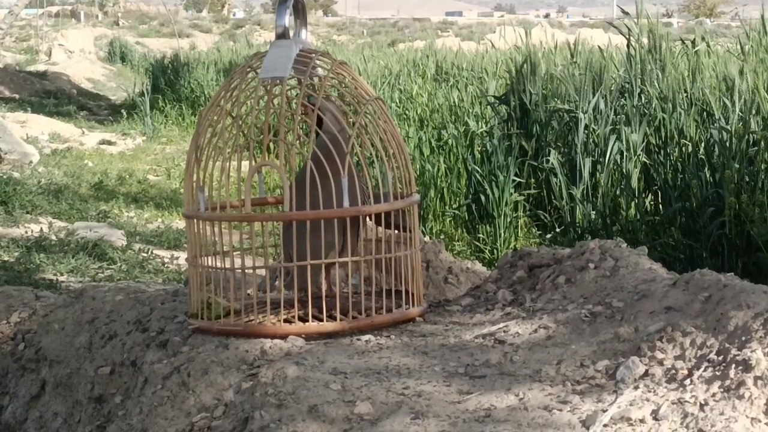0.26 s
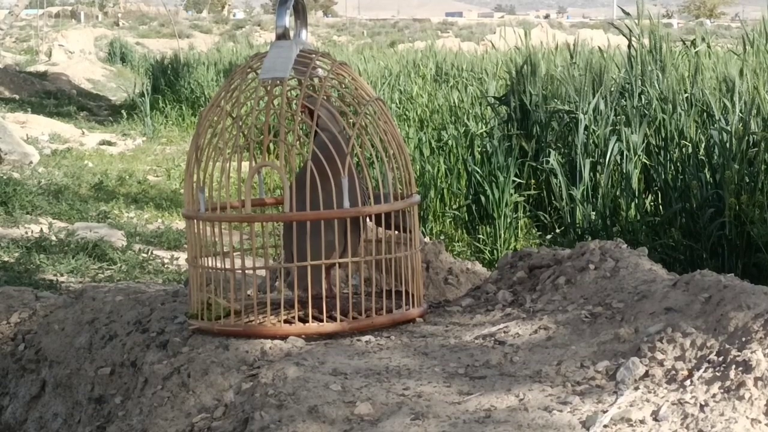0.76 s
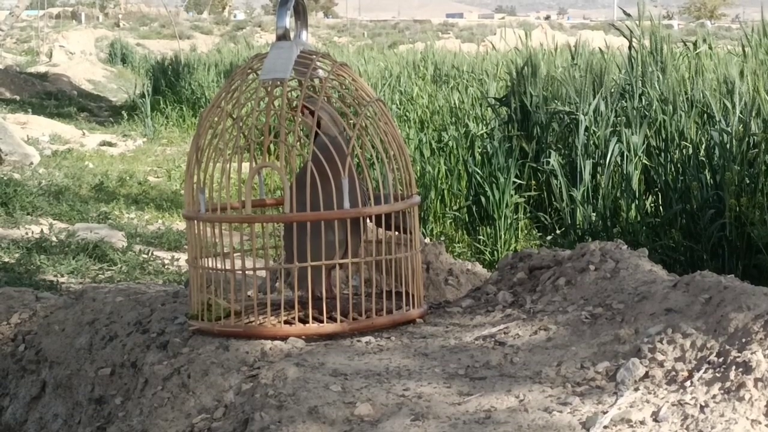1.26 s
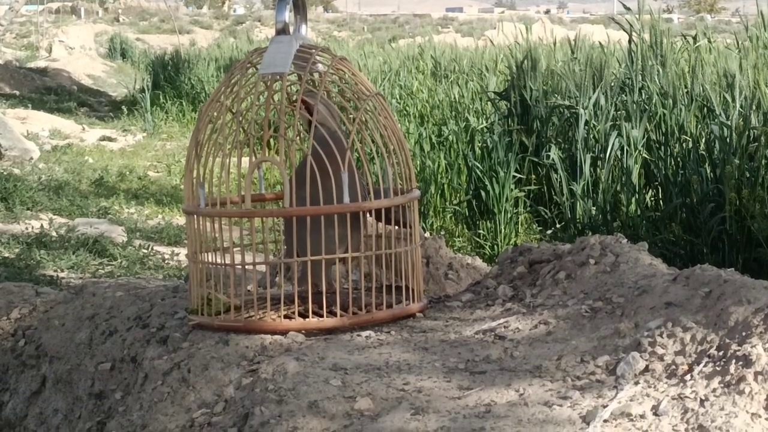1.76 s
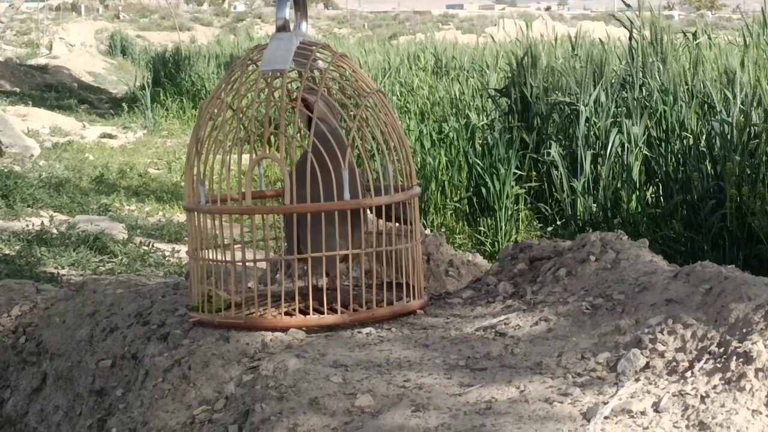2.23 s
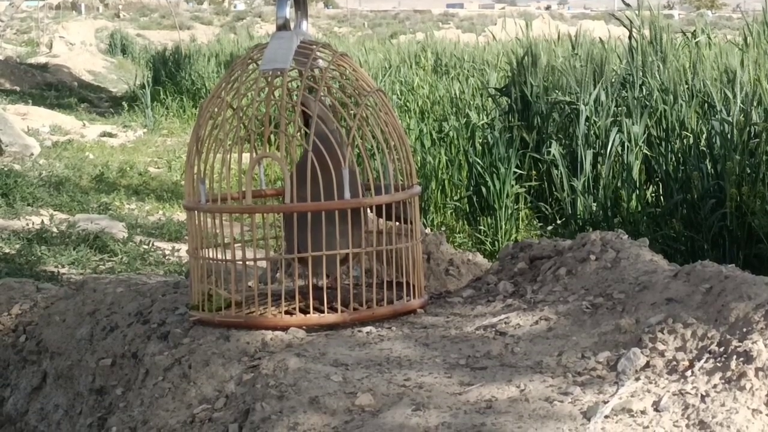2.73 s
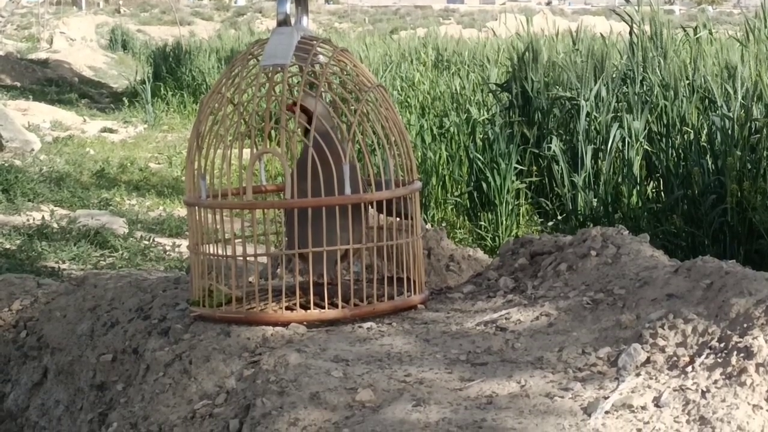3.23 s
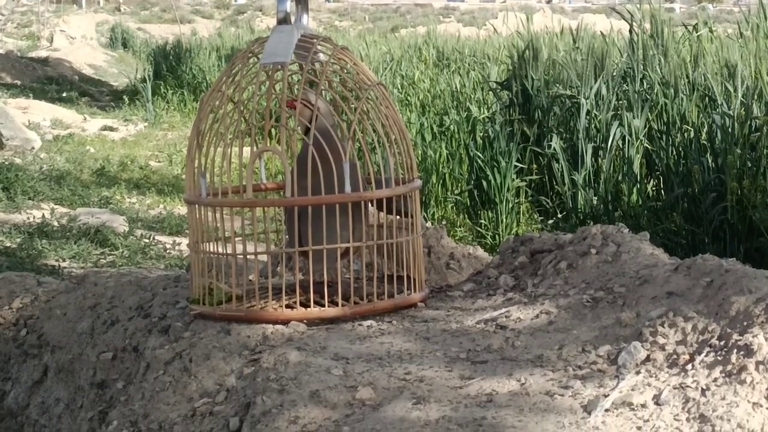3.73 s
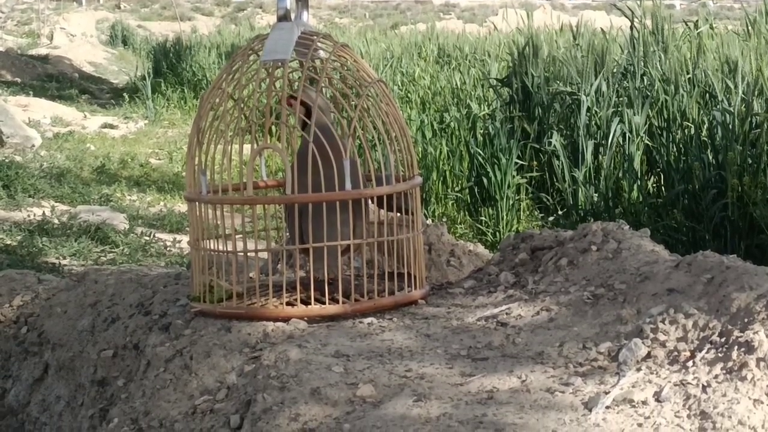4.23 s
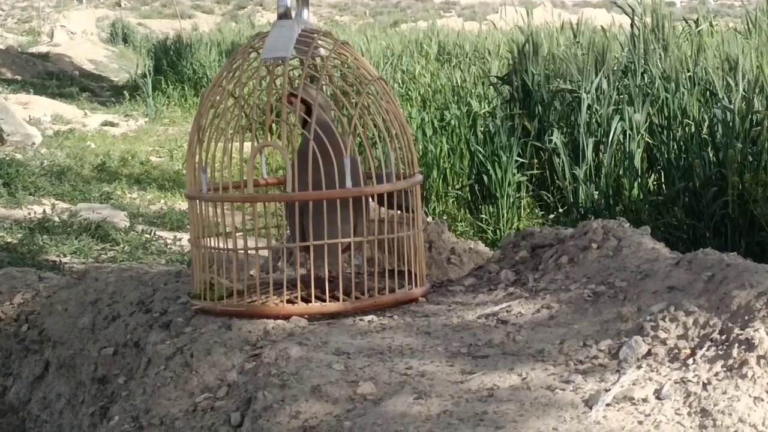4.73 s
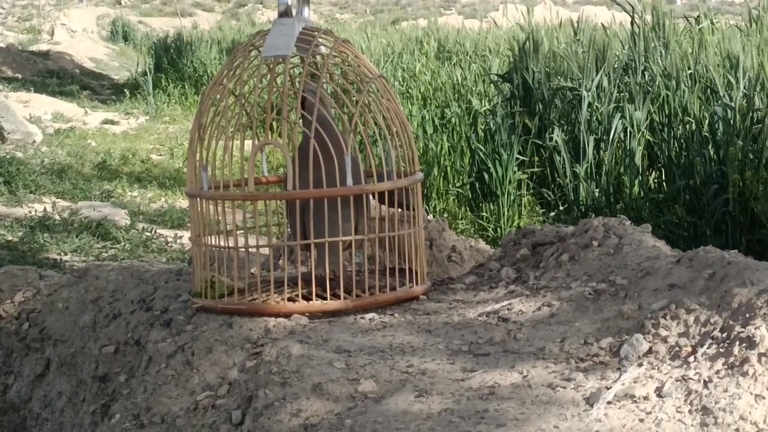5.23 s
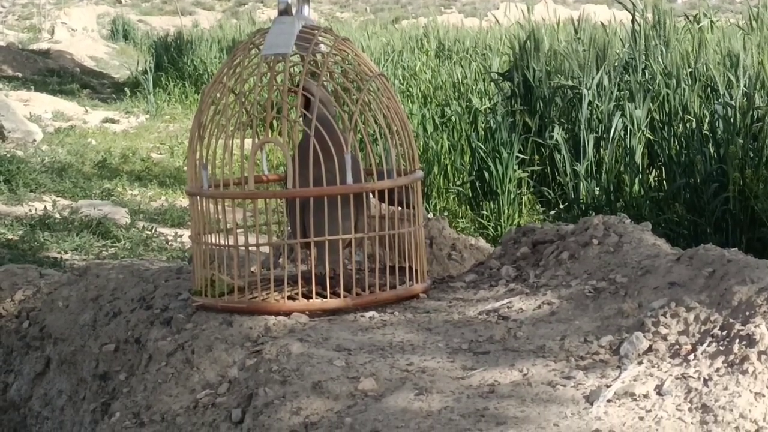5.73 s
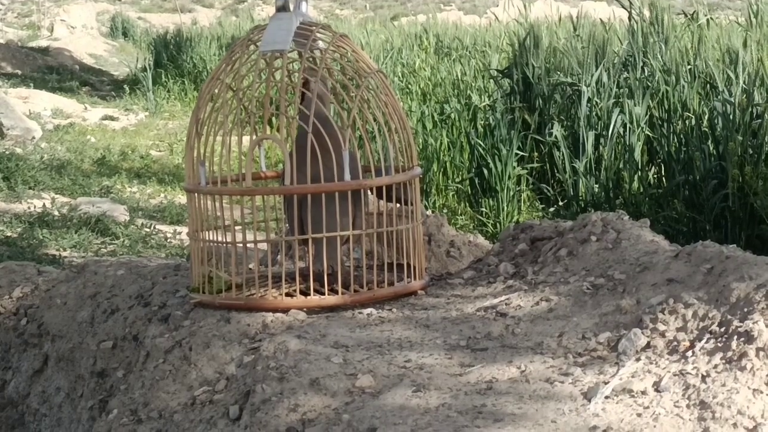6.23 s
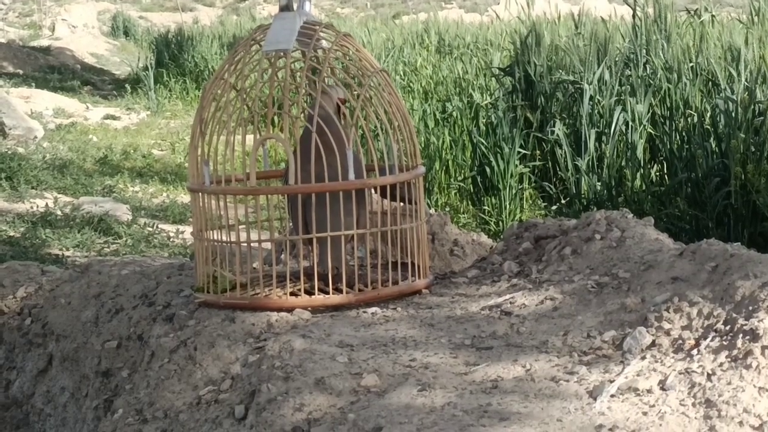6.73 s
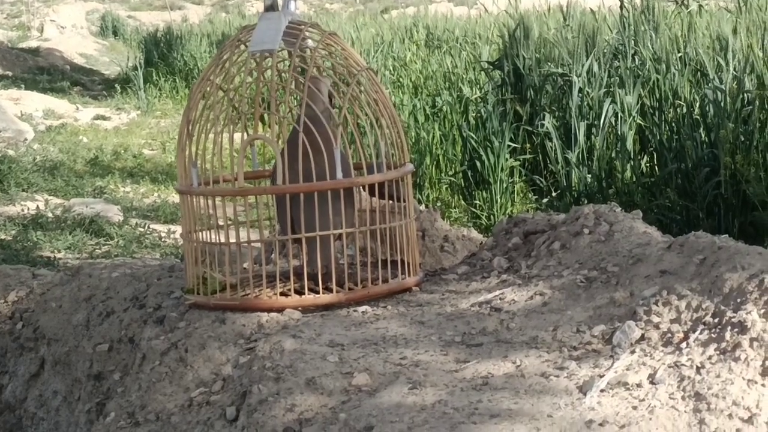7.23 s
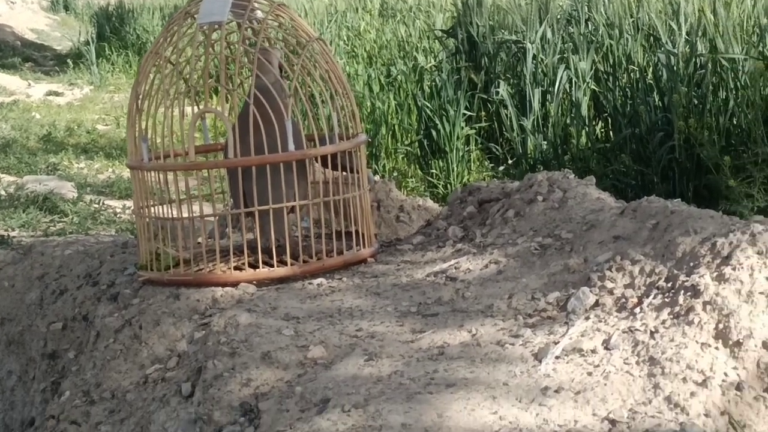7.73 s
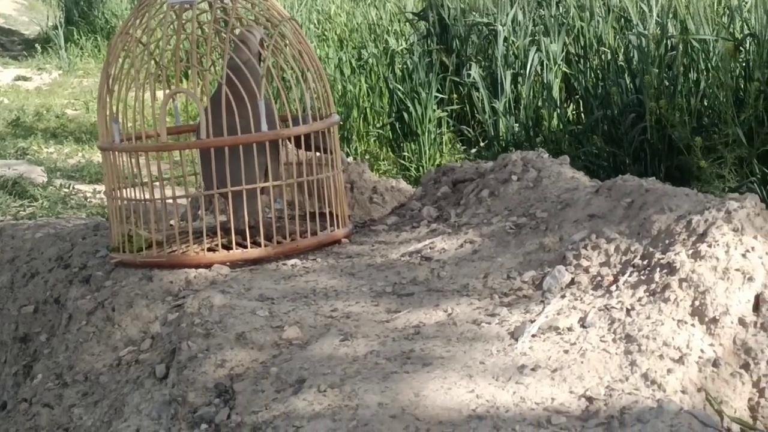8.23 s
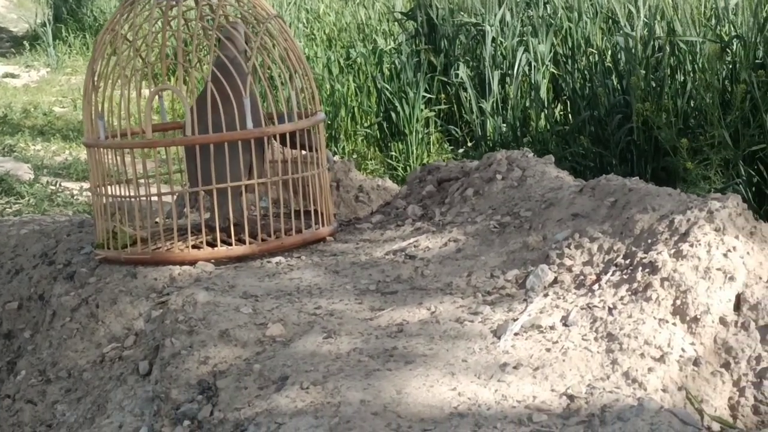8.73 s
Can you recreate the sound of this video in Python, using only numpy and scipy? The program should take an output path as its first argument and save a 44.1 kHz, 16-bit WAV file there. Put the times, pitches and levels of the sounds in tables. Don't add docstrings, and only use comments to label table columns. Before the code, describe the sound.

A caged partridge gives a loud burst of harsh clucking calls, then sparse soft clucks and rasps, with distant sparrows and wind puffs beside a field.

```python
import sys
import numpy as np
from scipy import signal
from scipy.fft import rfft, irfft, next_fast_len
from scipy.io import wavfile
from scipy.ndimage import uniform_filter1d

SR = 44100
rng = np.random.default_rng(int(sys.argv[2]) if len(sys.argv) > 2 else 0)


def unload_wav(signal):
    wavfile.write(
        sys.argv[1],
        SR,
        np.round(np.clip(np.atleast_2d(signal).T, -1, 1) * 32767).astype(np.int16),
    )


def elevation(decibels):
    levels = np.asarray(decibels, float)
    return 10 ** (levels / 20)


N = 395577


def partridge():
    free, steady, locked, lingering = syrinx()
    loud = loud_notes(free, steady, locked, lingering)
    soft = soft_notes((1 - locked) * free + locked * steady)
    voice = loud + soft + scattered(loud, soft)
    for notch_hz in (8000, 11800):
        voice = notch(voice, notch_hz, 6.5)
    return voice


# start_s, length_s, peak_after_s, peak_db, throat_stretch_ratio
BARKS = [
    (.214, 0.049, .022, -23, 0.95),
    (.582, 0.075, 0.027, -21, 0.98),
    (1.149, 0.059, .033, -19, 1.01),
    (1.333, .047, .023, -22, .95),
    (1.693, .084, 0.022, -18, 1.02),
    (2.27, 0.043, .024, -19, 1.013),
]
# start_s, length_s, peak_after_s, peak_db, throat_stretch_ratio
SONGS = [
    (.319, 0.072, 0.057, -20, 0.98),
    (.79, 0.049, .02, -25, 0.85),
    (.893, .08, .05, -20, .975),
    (1.433, .089, .052, -18, 1.004),
    (1.904, .051, .021, -22, .86),
    (2.006, .088, .052, -18.5, 1.009),
    (2.298, 0.11, .068, -19.5, 1.009),
    (2.561, .054, 0.024, -23.5, 0.88),
]
# time_s, throat_db, chest_db above throat, beak_db above throat
BARK_END = [
    (0, -23, -9, -19.5),
    (.03, -43, -22.5, -8),
    (.2, -66, -25, -3),
]
# throat_db re peak, chest_db re its level, beak_db re its level above throat
BARK_STAGES = [
    (-26, -14, -6),
    (-1.5, -2.5, 2.5),
    (0.07, .1, 0.05),
    (-1.5, -1.5, -2.5),
    (-21, -7, 6),
]
SONG_STAGES = [
    (-28, -8, -1.5),
    (-1.5, 0.14, -.5),
    (0.04, -1.5, .1),
    (-1.5, -3, -11),
    (-19, -16, -1.5),
]
# hz, width_hz, level_db
OPEN_TRACT = [
    [(452, 50, -6), (715, 170, -4)],
    [(1016, 88, -12), (1148.7, 78, 8.5), (1504, 178, -6.5)],
    [(3890, 200, 6.5), (4200, 340, -7), (5900, 830, -15)],
]
SUNG_TRACT = [
    [(490, 45, 0)],
    [(1033, 87, -4.5), (1230, 70, -3), (1494, 74, 3.5), (1850, 500, -27)],
    [(3926, 190, 2.5), (4154, 230, -2.5), (5800, 520, -15.5)],
]
# level_db, stretch_ratio, sink_share, upper_db, top_db
BEAKS = [(2, 1.0, .001, -5, -18), (5, 1.0, .03, .1, -9), (3, 1.015, .005, .1, 2.1), (3, 1.02, .02, -3, 1.1),
         (4, .97, .03, 3, 8), (-2, 1.01, .015, 1.1, 4), (0.1, .98, .015, 1.1, -2), (-2, 1.035, -.02, 4, -3),
         (4, 1.05, .03, -5, -4), (1.1, 1.02, -.02, -2, -2), (1.5, 1.0, .01, -4, -1),
         (2.1, 1.02, .01, 1.1, 2.1), (2.1, 1.0, .01, -3, -1.5), (1.1, 1.0, .02, .1, -1.5),
         (-4, 1.02, .02, 6, -1.5)]
# lower_db, upper_db
VALLEYS = [(-4, 1.1), (-1.5, -3), (-4, -5), (2.1, -4), (4, 5), (-10, -8), (2.1, -1), (-18, -6), (8, 6),
           (.1, 2.1), (-12, 4), (-2, 7), (-7, 5), (-1.5, 5), (4, 8)]


def loud_notes(free, steady, locked, lingering):
    tables, postures = [BARK_END], [(1, .98, 1)]
    for row in BARKS:
        beak_db = -20 + 4 * row[0]
        tables.append(staged(*row[:4], -39, beak_db, BARK_STAGES, (.01, 150, .03)))
        postures.append((1, row[4], 1.02 * row[4] ** .15))
    for row in SONGS:
        beak_db = -10 + 4 * min(row[0], 1.3)
        tables.append(staged(*row[:4], -34, beak_db, SONG_STAGES, (.016, 150, .016)))
        postures.append((1, row[4], row[4] ** .15))
    dark_valleys = np.add(VALLEYS, -4)
    chaotic = vocal_tract(free, tables, OPEN_TRACT, postures, .005, .07, BEAKS, dark_valleys)
    sung = vocal_tract(steady, tables, SUNG_TRACT, postures, .0042, 0, BEAKS, VALLEYS)
    loud = (1 - locked) * (1 - .45 * lingering) * chaotic + lingering * sung
    for notch_hz, sharpness in [(2450, 12.0), (3250, 9.2), (4950, 11.0)]:
        loud = notch(loud, notch_hz, sharpness)
    return loud


# start_s, peak_db, chest_db, beak_db above throat, throat_stretch_ratio
CLUCKS = [
    (5.0, -39.5, -42, -24, 1.05),
    (6.617, -39.5, -32.5, -21, 1.02),
    (7.365, -43.5, -36.5, -8.5, 1.013),
    (8.165, -40, -35, -14, 0.995),
    (8.39, -47, -41, -10, .97),
    (8.675, -40.5, -35, -12, .99),
]
# start_s, length_s, peak_db, chest_db, chest_stretch_ratio
RASPS = [
    (5.193, .062, -27, -43, 1.07),
    (6.254, 0.057, -34.5, -43, 1.2),
    (7.003, 0.066, -39.5, -44.5, 1.166),
    (7.858, .062, -36, -42, 1.3),
    (8.35, .053, -34.5, -41, 1.25),
]
# throat_db re peak, chest_db re its level, beak_db re its level above throat
CLUCK_STAGES = [
    (-16, -8.5, -12),
    (-9, -3.5, -5),
    (0, 0.5, -0.5),
    (-.5, -.5, 1),
    (-18.5, -10, 10.5),
]
RASP_STAGES = [
    (-30, -5, -1),
    (-5, 1.5, 0.8),
    (0.2, -1, -0.2),
    (-5, -1, -0.6),
    (-18, -6, 3),
]
# hz, width_hz, level_db
CLUCK_TRACT = [
    [(460, 40, -8), (693, 90, 4.5)],
    [(1010, 180, 5), (1415, 192, 7), (2370, 210, -13)],
    [(3940, 460, -6), (5900, 620, -13.5)],
]
RASP_TRACT = [
    [(560, 85, 0)],
    [(1240, 200, -8), (1780, 100, 1.5), (2150, 100, 4), (2420, 130, -4), (2900, 400, -18)],
    [(3550, 236, -4.5), (4300, 425, -0.5), (5900, 800, -8)],
]


def soft_notes(source):
    length_s = .04
    clucks = [staged(row[0], length_s, .51 * length_s, *row[1:4], CLUCK_STAGES, (.0082, 30, .019))
              for row in CLUCKS]
    rasps = [staged(s, length, .5 * length, db, chest_db, -8, RASP_STAGES, (.014, 30, .014))
             for s, length, db, chest_db, _ in RASPS]
    cluck_postures = [(row[-1] ** .5, row[-1], 1) for row in CLUCKS]
    rasp_postures = [(row[4], 1, 1) for row in RASPS]
    soft = vocal_tract(source, clucks, CLUCK_TRACT, cluck_postures, .0042, .1)
    soft += vocal_tract(source, rasps, RASP_TRACT, rasp_postures, .011, .18)
    soft += blips() + sigh() + rasp_tones()
    return notch(filtered(soft, 4, 340, "high"), 2950, 12.0)


# start_s, length_s, from_hz, to_hz, jitter_share
LOCKED = [(.335, 0.029, 445, 465, 0.03), (0.801, 0.034, 450, 466, .022), (.908, .047, 452, 474, .006),
          (1.452, .046, 473.9, 492.6, .006), (1.912, .033, 468, 486, .028), (2.018, .056, 470, 496, .012),
          (2.305, .077, 447, 502, .006), (2.572, .038, 486, 474, .012), (5.0, .04, 720, 750, .08),
          (6.616, .018, 620, 750, .02), (6.634, .012, 740, 690, .03), (8.675, .016, 680, 720, .04)]
MANNER = [(.7, .25), (.7, .45), (.5, .08), (.55, .1), (.5, .35), (.55, .4), (.8, .05), (.5, .45), (.5, .5),
          (.7, .12), (.7, .12), (.7, .2)]


def syrinx():
    free_hz, chaos = 470, .55
    sag_hz_per_s, linger_s = 600, .011
    t = np.arange(N) / SR
    pitch = np.full(N, float(free_hz))
    rough, alternation, locked, lingering = np.zeros((4, N))
    for (start, length, from_hz, to_hz, loose), (share, alternate) in zip(LOCKED, MANNER):
        end, glide_s = start + length, share * length
        near = (t >= start - .003) & (t <= end + .05)
        late = t[near] - start - glide_s
        glide = np.sin(np.pi / 2 * np.clip(1 + late / glide_s, 0, 1)) ** 2
        pitch[near] = from_hz + (to_hz - from_hz) * glide - sag_hz_per_s * np.maximum(late, 0)
        rough[near], alternation[near] = abs(loose), alternate
        locked[(t >= start) & (t <= end)] = 1
        lingering[near] = (t[near] >= start) * np.exp(-(np.maximum(t[near] - end, 0) / linger_s) ** 2)
    free, steady = pulses(free_hz, chaos, .12), pulses(pitch, rough, alternation)
    return free, steady, uniform_filter1d(locked, size=200), uniform_filter1d(lingering, size=200)


def pulses(pitch, rough, alternation):
    phase = 2 * np.pi * np.cumsum(pitch * np.exp(rough * wobble(400))) / SR
    count = 31
    train = np.sin((count + .5) * phase) / (2 * np.sin(phase / 2) + 1e-9) - .5
    train = np.clip(train, -count, count) * (1 + alternation * np.cos(phase / 2))
    train = train * elevation(2.5 * rough * np.clip(wobble(300), -2, 1.5))
    air = rng.standard_normal(N) * (1 + np.cos(phase))
    treble_air = 2.3 * filtered(air, 4, 6500, "high") * elevation(3.0 * wobble(90))
    return train + (.3 + 4 * rough) * air + treble_air


# hz, width_hz, level_db
TOP_TRACT = [(8700, 450, -29.5), (9980, 350, -29), (11116, 550, -30.5), (12700, 800, -33),
             (14690, 800, -34)]
# hz, width_hz, level_db
VALLEY_TRACT = [
    (2200, 330, -34),
    (2830, 250, -34),
]
# time_s, level_db, half_width_s
SURGES = [(.236, 8, .004), (.341, 4, .002), (.348, 4, .002), (.371, 4, .007), (.598, 5, .003),
          (.611, 6, .005), (.633, 6, .006), (.650, 3, .003), (1.168, 5, .003), (1.183, 6, .004),
          (1.357, 8, .004), (1.506, 1.1, .004), (1.717, 3, .005), (1.741, 4.5, .005), (2.296, 4, .006),
          (5.232, 3, .006), (6.292, 4, .005), (7.887, 3, .006), (8.366, 3, .004), (7.047, 3, .005),
          (.825, 3, .008), (1.47, 1.5, .015), (.962, 1.5, .006), (2.36, 1.5, .012), (7.372, 4, .003),
          (7.39, 3, .003)]


def vocal_tract(source, tables, tract, postures, edge_s, sink, beaks=None, valleys=None):
    out, lead = np.zeros(N), 900
    padded = np.concatenate([source[:lead], source])
    for n, (rows, posture) in enumerate(zip(tables, postures)):
        s, throat_db, chest_db, beak_db = np.transpose(rows)
        more_db, stretch, beak_sink, upper_db, top_db = beaks[n] if beaks else (0, 1, 0, 0, 3)
        a, b = int(s[0] * SR), min(int(s[-1] * SR), N)
        t = np.arange(a, b) / SR
        edge = np.clip((s[-1] - t) / edge_s, 0, 1)
        if a > 50:
            edge = edge * np.clip((t - s[0]) / edge_s, 0, 1)
        late = np.clip((np.arange(b - a + lead) - lead) / (b - a), 0, 1)
        surge_db = sum(db * np.exp(-((t - at) / width) ** 2) for at, db, width in SURGES)

        throat = list(tract[1])
        if beaks:
            throat += [(hz, width, db + own_db) for (hz, width, db), own_db in zip(VALLEY_TRACT, valleys[n])]
        beak = list(tract[2][:-1]) + [tuple(np.add(tract[2][-1], (0, 0, upper_db)))]
        for hz, width, db in TOP_TRACT:
            beak.append((hz, width, db + top_db - 3 + 3.5 * rng.standard_normal()))

        chest_ratio, throat_ratio, beak_ratio = posture
        parts = [(tract[0], chest_ratio, throat_db + chest_db, sink, 0),
                 (throat, throat_ratio, throat_db, sink / 4, 1),
                 (beak, beak_ratio * stretch, throat_db + beak_db + more_db, beak_sink, .3)]
        for modes, ratio, db, drop, surge_share in parts:
            part = sinking(padded[a:b + lead], modes, ratio, drop, late)
            part = (part / np.sqrt(uniform_filter1d(part ** 2, size=250) + 1e-12))[lead:]
            out[a:b] += part * edge * elevation(np.interp(t, s, db) + surge_share * surge_db)
    return out


def sinking(x, modes, ratio, drop, late):
    out = 0
    for k in (-1, 0, 1) if drop else (0,):
        tuned = np.array(modes) * [np.clip(ratio * (1 - k * drop), .5, 2), 1, 1]
        fade = np.clip(1 - np.abs(2 * late - 1 - k), 0, 1) if drop else 1
        out = out + resonate(x, tuned) * fade
    return out


def resonate(x, modes):
    out = 0
    for k, (hz, width, db) in enumerate(modes):
        r = np.exp(-np.pi * 1.5 * width / SR)
        b = (1 - r * r) / 2 * np.array([1, 0, -1])
        a = [1, -2 * r * np.cos(2 * np.pi * hz / SR), r * r]
        out = out + (-1) ** k * elevation(db) * signal.lfilter(b, a, signal.lfilter(b, a, x))
    return out


def staged(start, length, peak_s, peak_db, chest_db, beak_db, stages, timing):
    attack_s, swell_db_per_s, release_s = timing
    attack_s = min(attack_s, peak_s - .001)
    release_at = np.clip(length - release_s, peak_s + .001, length)
    s = start + np.array([0, attack_s, peak_s, release_at, length + .002])
    throat, chest, beak = np.transpose(stages)
    swell_db = swell_db_per_s * (peak_s - attack_s)
    throat = peak_db + throat - swell_db * np.array([0, 1, 0, 0, 0])
    return np.transpose([s, throat, chest_db + chest - throat, beak_db + beak])


# time_s, throat_db, throat_hz, chest_hz, chest_db
BLIPS = [
    (3.998, -45.5, 1028, 503, -75.5),
    (4.418, -41, 1016, 470, -72),
    (4.69, -51.5, 1223, 414.9, -69.5),
    (5.789, -53, 1127, 426, -62.5),
    (6.078, -43, 992, 460, -68),
    (7.75, -42.5, 1030, 698.4, -55.5),
]


def blips():
    out, t = np.zeros(N), np.arange(2600) / SR
    throat_swell = (t / .0043 * np.exp(1 - t / .0047)) ** 2
    chest_swell = (t / .0056 * np.exp(1 - t / .0077)) ** 2
    for s, throat_db, throat_hz, chest_hz, chest_db in BLIPS:
        throat = elevation(throat_db) * np.sin(2 * np.pi * throat_hz * t) * throat_swell
        chest = elevation(chest_db + 4.5) * np.sin(2 * np.pi * chest_hz * t) * chest_swell
        a = int((s - .005) * SR)
        out[a:a + len(t)] += throat + chest
    return out * (1 + .16 * wobble(290))


# time_s, pitch_hz, level_db
SIGH = [
    (5.063, 550, -62),
    (5.088, 606, -49),
    (5.112, 470, -56),
    (5.138, 400, -66),
]


def sigh():
    s, hz, db = np.transpose(SIGH)
    t = np.arange(N) / SR
    phase = 2 * np.pi * np.cumsum(uniform_filter1d(np.interp(t, s, hz), size=400)) / SR
    level = elevation(uniform_filter1d(np.interp(t, s, db, left=-120, right=-120), size=200))
    return np.sqrt(2) * level * (np.sin(phase) + elevation(-9.5) * np.sin(2 * phase))


# start_s, end_s, start_hz, end_hz, level_db
RASP_TONES = [(5.194, 5.206, 1050, 1100, -55), (5.22, 5.247, 470, 430, -42),
              (6.253, 6.273, 1050, 1250, -51), (6.281, 6.306, 440, 425, -43),
              (6.997, 7.017, 1130, 1180, -50), (7.033, 7.056, 440, 420, -50),
              (7.041, 7.054, 1220, 1230, -46), (7.051, 7.069, 670, 650, -45),
              (7.857, 7.868, 1130, 1180, -56), (7.902, 7.919, 690, 670, -42),
              (8.347, 8.358, 1200, 1280, -56), (8.406, 8.429, 650, 640, -44), (8.188, 8.208, 480, 400, -46),
              (6.638, 6.656, 500, 400, -45)]


def rasp_tones():
    return glides(RASP_TONES, at_s=0, level_db=0) * (1 + .15 * wobble(200))


def scattered(loud, soft):
    thin = filtered(loud, 2, 800, "high")
    low_band = resonate(loud, [(1170, 200, -9), (4000, 900, 0)])
    high_band = resonate(loud, [(2850, 300, -2), (6400, 1300, .1)])
    tail = elevation(-15.5) * echoes(thin, .13, .0038) + elevation(-16) * echoes(soft, .075, .0026)
    tail += elevation(-23) * np.roll(echoes(soft, .06, .004), int(.022 * SR))
    tail += elevation(-36) * echoes(thin + 1.2 * soft, .28, .02)
    tail += elevation(-26) * echoes(low_band, .25, .02)
    return tail + elevation(-15) * echoes(high_band, .17, .01)


def echoes(x, t60, gap_s):
    t = np.arange(int(.5 * SR)) / SR
    tail = rng.standard_normal(len(t)) * elevation(-60 * t / t60) * (1 - np.exp(-t / gap_s))
    tail = filtered(tail, 1, 6500, "low")
    return signal.fftconvolve(x, tail / np.linalg.norm(tail))[:N]


# start_s, end_s, start_hz, end_hz, level_db, then pitches passed in hz
PEAKED_CHIRP = [(0, .047, 2679, 4300, -7), (.002, .022, 5610, 6480, 0.5), (.02, .042, 5123, 6137, 2.5),
                (.03, .065, 2800, 4464, 5.5), (.06, .078, 4630, 5900, 0.5), (.075, .095, 5800, 4580, -1.5),
                (.088, .138, 4500, 2850, 7.5)]
HOODED_CHIRP = [(0, .05, 2700, 4600, -4, 2820, 3100, 3800), (.055, .09, 5000, 5200, -7, 5900),
                (0, .035, 5400, 6390, -11.5), (-.004, .05, 4200, 5230, -13),
                (.025, .068, 2750, 4550, 1, 2950, 3350, 4100),
                (.082, .135, 4600, 2500, 4, 4300, 4200, 4150, 3500), (.06, .11, 5300, 4800, -8)]
HIDDEN_CHIRP = [
    (0, .035, 4828, 6022, -4),
    (.015, .05, 2800, 3104, 2.5),
    (.06, .11, 5000, 4500, 3),
    (.1, .145, 4500, 2750, 3, 4300, 4000, 3400),
]
ARCHED_CHIRP = [(-.006, .036, 2800, 4600, -4, 2900, 3250, 3800, 4400),
                (.014, .095, 2800, 2980, 6, 3900, 3950, 3750, 3600, 3150), (.036, .06, 4600, 4450, -5),
                (.06, .082, 4600, 4450, -6), (.082, .115, 4550, 4050, -13),
                (-.015, .02, 3900, 4600, -19, 4500), (-.01, .035, 5100, 5250, -21),
                (-.005, .03, 5500, 5900, -22), (.07, .115, 3900, 3550, -9, 3600)]
RISING_CHIRP = [(0, .055, 2000, 2350, -10), (-.002, 0.03, 3900, 4500, -11), (.0, .03, 4600, 5200, -12),
                (.008, .045, 5450, 5645, -11), (.02, .06, 6100, 6900, -17), (.005, .03, 2550, 2950, -1.5),
                (.025, .05, 3200, 3730, -2), (.04, .09, 2800, 3300, -9), (.043, .075, 4200, 4200, 0),
                (.045, 0.0778, 3500, 3693, 0.5)]
BLURRED_CHIRP = [
    (0, .05, 5090, 5110, -13),
    (.03, 0.097, 3901, 3380, -1),
    (.05, .14, 4300, 4150, -10.5),
    (.06, .15, 3350, 3000, -18),
    (.07, .14, 3500, 3840, -10),
]
# time_s, level_db, echo_db
PEAKED = [
    (5.645, -58, -10),
]
HOODED = [
    (7.308, -52, -5),
]
HIDDEN = [
    (1.661, -55.5, -2),
]
ARCHED = [
    (2.921, -52.5, -10.5),
]
RISING = [
    (6.374, -60.5, -5.5),
    (8.945, -68.5, -4.5),
]
BLURRED = [
    (3.3, -86, 12),
    (3.71, -88, 12),
    (5.32, -81, 12),
    (7.69, -83, 12),
    (6.83, -88, 12),
]
# start_s, end_s, start_hz, end_hz, level_db, then pitches passed in hz
WHISTLES = [(7.228, 7.3, 2200, 1750, -62, 2180, 2120, 1950), (4.11, 4.2, 515, 500, -70),
            (6.76, 6.89, 1280, 1270, -70), (7.44, 7.48, 800, 780, -70), (6.755, 6.79, 5500, 5450, -76),
            (7.2, 7.23, 3500, 3200, -81), (.5, .54, 4150, 4100, -68), (8.81, 8.9, 1350, 1340, -70),
            (3.61, 3.64, 3200, 2300, -78), (4.93, 4.96, 4400, 4300, -73), (3.58, 3.7, 1430, 1390, -78),
            (3.8, 3.85, 510, 500, -77), (.525, .565, 5300, 5300, -73), (.14, .18, 3700, 3600, -70)]


def sparrows():
    flutter = wobble(230)
    direct = glides(WHISTLES, at_s=0, level_db=-2.5) * (1 + .45 * wobble(60))
    wet = np.zeros(N)
    kinds = [(PEAKED_CHIRP, PEAKED, .5), (HOODED_CHIRP, HOODED, .4), (HIDDEN_CHIRP, HIDDEN, .45),
             (ARCHED_CHIRP, ARCHED, .4), (RISING_CHIRP, RISING, .7), (BLURRED_CHIRP, BLURRED, .9)]
    for chirp, rows, burr in kinds:
        for s, db, echo_db in rows:
            one = glides(chirp, s, db) * (1 + burr * flutter)
            direct = direct + one
            wet = wet + elevation(echo_db) * one
    return direct + echoes(.55 * wet + .6 * resonate(wet, [(4400, 1200, 0)]), .16, .0088)


def glides(strokes, at_s, level_db):
    out = np.zeros(N + SR)
    for start, end, from_hz, to_hz, db, *via_hz in strokes:
        u = np.linspace(0, 1, int((end - start) * SR))
        path = np.interp(u, np.linspace(0, 1, len(via_hz) + 2), [from_hz, *via_hz, to_hz])
        path = uniform_filter1d(path, size=200, mode="nearest")
        tone = np.sin(2 * np.pi * np.cumsum(path) / SR)
        a = int((at_s + start) * SR)
        out[a:a + len(u)] += np.sqrt(2) * elevation(level_db + db) * np.abs(np.sin(np.pi * u)) ** .7 * tone
    return out[:N]


# time_s, pitch_hz, level_db
CHEEPS = [(3.52, 3600, -75), (3.59, 4200, -78), (3.62, 4900, -75), (3.82, 2050, -76), (3.9, 4600, -73),
          (4.03, 5600, -77), (4.045, 4800, -74), (4.3, 4650, -73), (4.42, 3600, -74), (4.65, 3300, -75),
          (4.85, 4200, -75), (4.885, 5400, -74), (4.89, 4000, -77)]


def cheeps():
    half_s, rise = .0125, 1.06
    strokes = [(s - half_s, s + half_s, hz / rise, hz * rise, db) for s, hz, db in CHEEPS]
    dry = glides(strokes, at_s=0, level_db=-8.5)
    return dry + elevation(1.5) * echoes(dry, .09, .004)


# time_s, peak_db, fall_s (time to fall by 20.5 dB)
GUSTS = [(0, -65, .1), (.2, -50.5, 0.07), (.98, -56, 0.2), (1.17, -47.5, .13), (3.4, -62, .15),
         (3.62, -56.5, .12), (3.75, -49, 0.2), (4.67, -66.5, 0.06), (5.09, -55, .14), (5.32, -49, 0.13),
         (5.54, -50.5, 0.16), (5.8, -66.5, .4), (7.02, -59.5, .2), (8.79, -63, 0.04)]
# hz, level_db per Hz
WIND_COLOUR = [(12, -45.5), (20, -14), (49, -7), (70, 1.5), (108, -2.5), (162, -18.5), (250, -34),
               (320, -67), (550, -120)]


def wind():
    t = np.arange(N) / SR
    gust_db = np.max([peak_db - 20.5 * np.abs(t - s) / fall_s for s, peak_db, fall_s in GUSTS], axis=0)
    breeze_db = -78
    lumps_db = 2.5 * wobble(36) + 3.0 * wobble(7)
    return elevation(np.maximum(gust_db, breeze_db) + lumps_db) * coloured(WIND_COLOUR)


# hz, level_db per Hz
FIELD = [(35, -37), (60, -13.5), (120, -0.5), (160, -9), (480, -25), (1480, -22.5), (1700, -26),
         (2800, -31.5), (6200, -34.5), (8000, -43.5), (14000, -49)]


def field():
    hiss = elevation(-81) * filtered(rng.standard_normal(N), 6, 14300, "high")
    return elevation(-70 + .7 * wobble(3)) * coloured(FIELD) + hiss


def coloured(spectrum):
    size = next_fast_len(N)
    hz, db = np.transpose(spectrum)
    bins_hz = np.arange(size // 2 + 1) * SR / size
    gain = elevation(np.interp(np.log(bins_hz + 1), np.log(hz), db, left=-90))
    return rms_one(irfft(rfft(rng.standard_normal(size)) * gain, size)[:N])


def wobble(hz):
    return rms_one(filtered(rng.standard_normal(N), 2, hz, "low"))


def rms_one(x):
    return x / np.sqrt(np.mean(x ** 2) + 1e-20)


def filtered(x, order, hz, kind):
    return signal.sosfilt(signal.butter(order, hz, kind, fs=SR, output="sos"), x)


def notch(x, hz, sharpness):
    return signal.lfilter(*signal.iirnotch(hz, sharpness, fs=SR), x)


def scene():
    return (partridge() + sparrows() + wind() + field() + cheeps())[None, :]


def top_cut(x):
    return signal.sosfilt(signal.butter(12, 15780, fs=SR, output="sos"), x)


def record(dry):
    cut = filtered(dry, 2, 45, "high")
    cut = signal.sosfilt(signal.ellip(10, .5, 70, 15600, fs=SR, output="sos"), cut)
    return top_cut(cut)


dry = scene()
out = record(dry)
unload_wav(out)
```